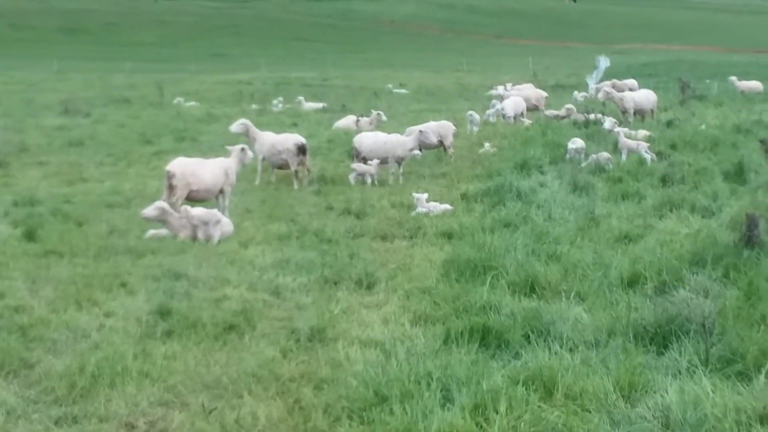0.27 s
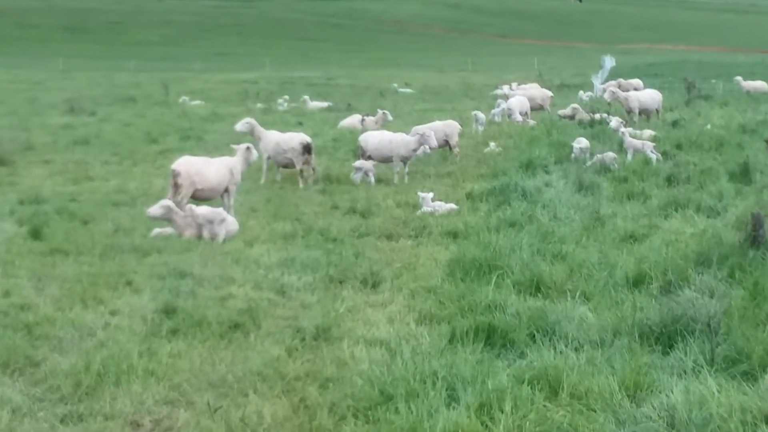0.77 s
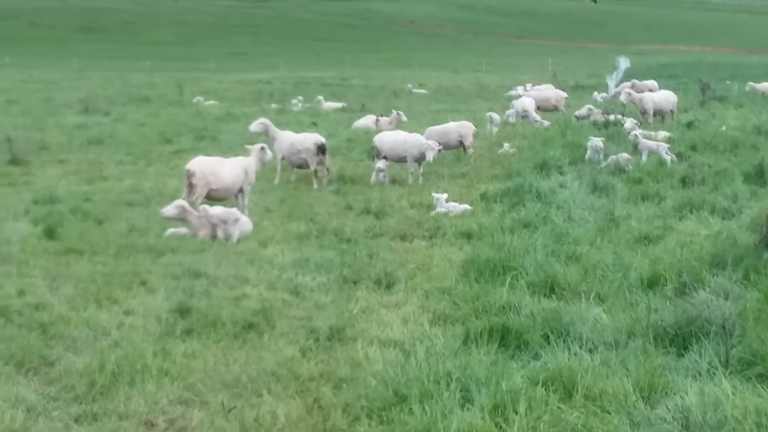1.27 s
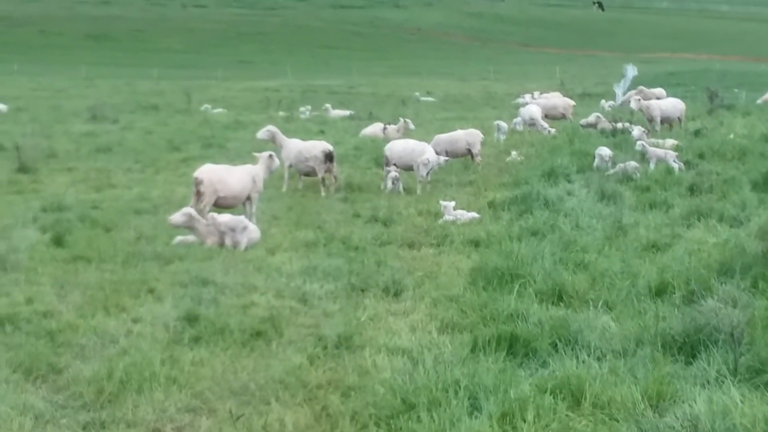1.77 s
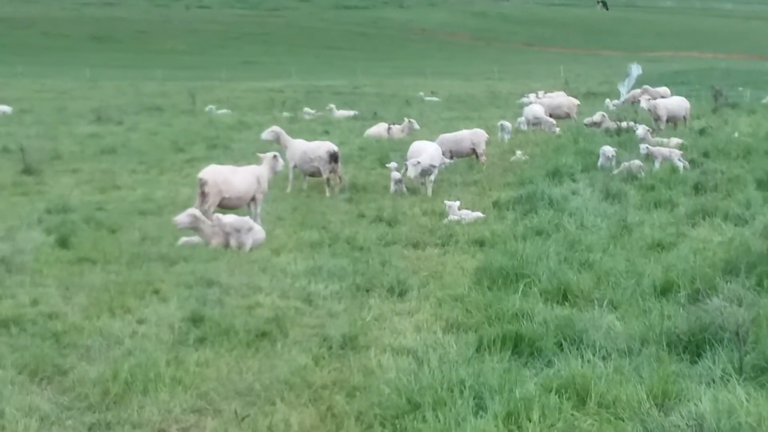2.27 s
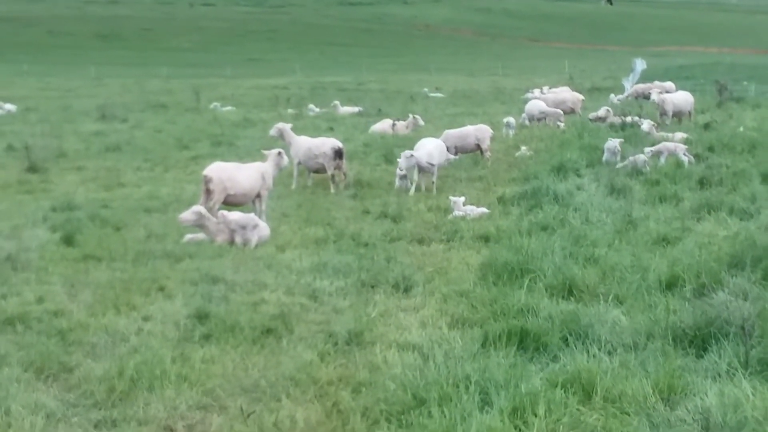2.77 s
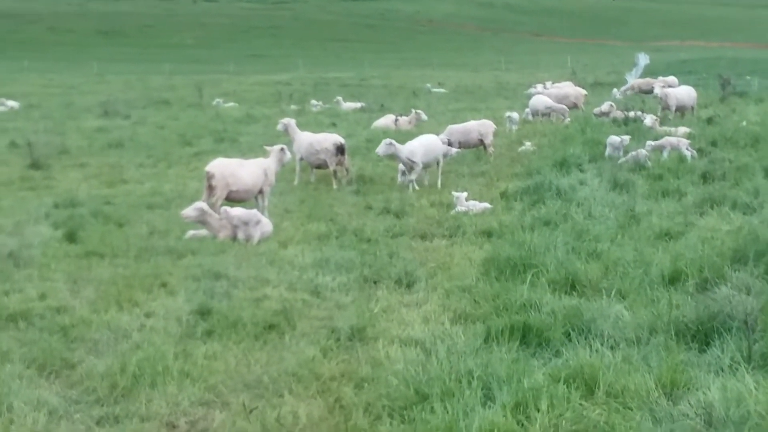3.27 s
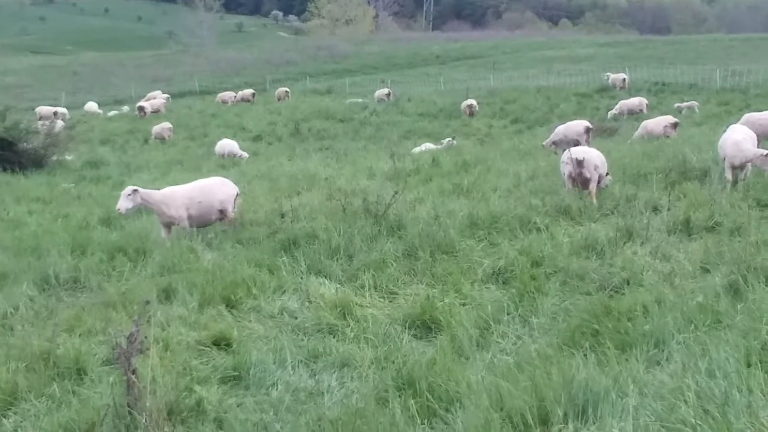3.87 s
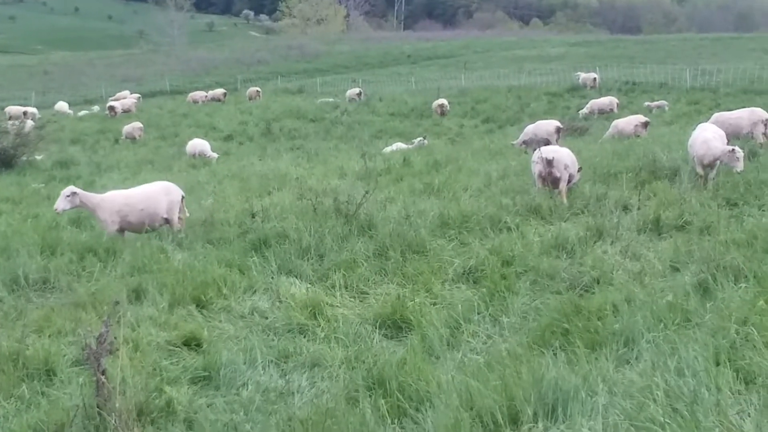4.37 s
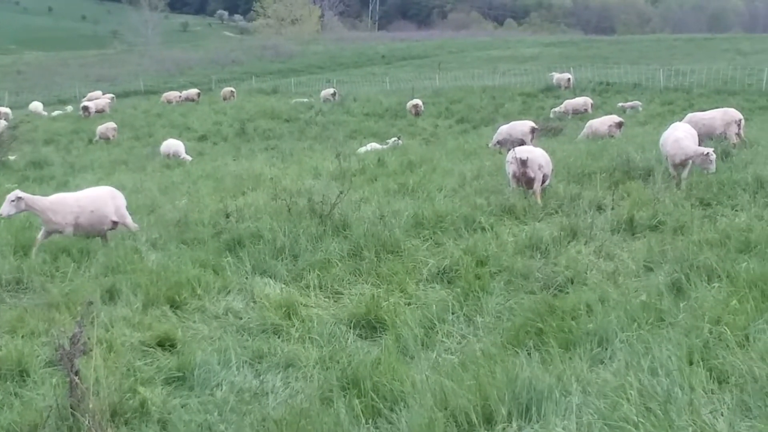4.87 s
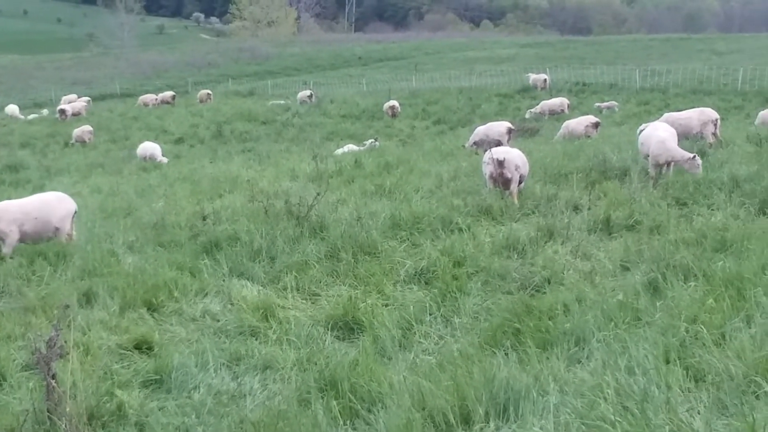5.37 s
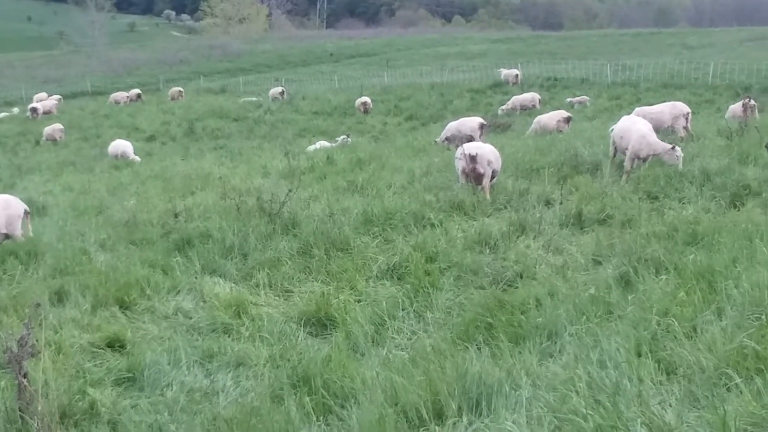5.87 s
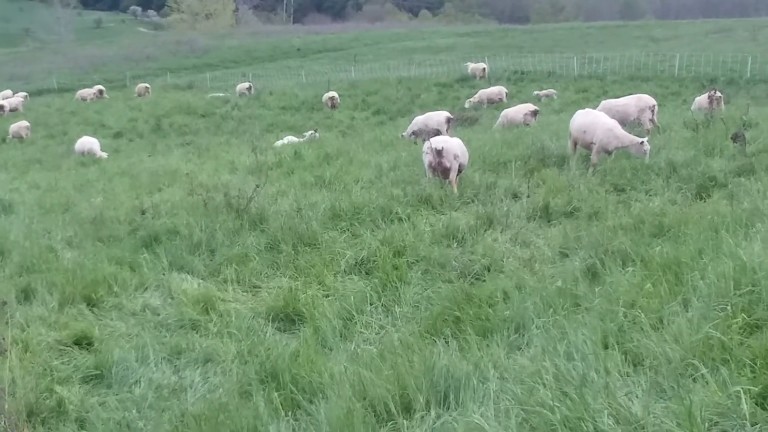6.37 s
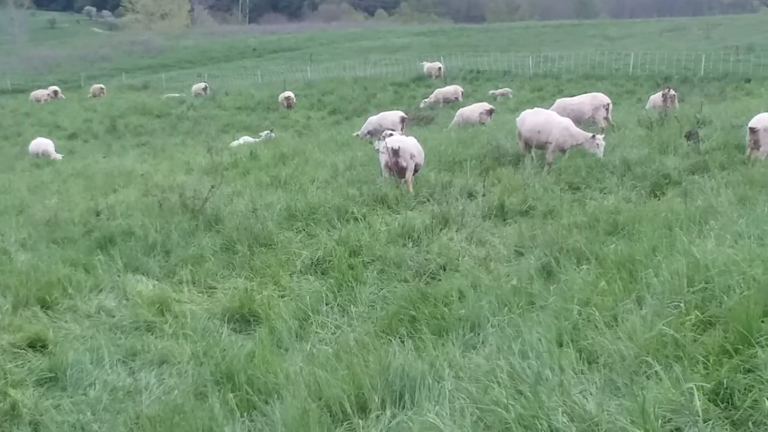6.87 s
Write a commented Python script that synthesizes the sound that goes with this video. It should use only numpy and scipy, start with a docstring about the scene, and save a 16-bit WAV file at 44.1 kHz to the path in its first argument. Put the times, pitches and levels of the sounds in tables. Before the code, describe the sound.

Quiet pasture ambience with far roar and droning engine, small bird whistles, distant lamb bleats, grass ticks and a quick run of frog croaks.

```python
"""Birds whistle and chirp over a far roar, a thin hiss and an idling engine's hum in an open paddock. Grass
rustles and ticks near the microphones, and a faint far rattle murmurs near 2.8 kHz for a while; five lambs
bleat and a frog croaks a rapid run. Birds are gliding tones, lambs harmonic voices with breath, the frog clicks
ringing three modes. Grass and air are shaped noise; engines are sums of sines, a second one joining to beat
against the hum. All sound drops out briefly just before the second engine joins."""
import sys
import numpy as np
from scipy import signal
from scipy.fft import rfft, irfft, next_fast_len
from scipy.io import wavfile
from scipy.ndimage import uniform_filter1d, map_coordinates

SR = 44100
rng = np.random.default_rng(int(sys.argv[2]) if len(sys.argv) > 2 else 0)


def to_wav(sig):
    """Store sig (one row per channel, or 1-D mono) as 16-bit WAV at the path in sys.argv[1].

    Samples outside -1..1 are clipped; the rate is SR.
    """
    pcm = np.clip(np.atleast_2d(sig), -1, 1) * 32767
    pcm = np.round(pcm).astype(np.int16)
    wavfile.write(sys.argv[1], SR, pcm.T)  # frames by channels


N = 313551


def amp(db):
    """Gain of a level in dB."""
    return 10 ** (np.asarray(db) / 20)


def unit(x):
    """x at rms 1."""
    return x / np.sqrt(np.mean(x ** 2) + 1e-20)


def along(points, hz):
    """Value at hz of a curve of (Hz, value) points, read on a log frequency axis."""
    f, v = np.transpose(points)
    return np.interp(np.log(hz + 1), np.log(f + 1), v)


def span(rows, smooth=.004):
    """First sample, times and smoothed columns of a table whose rows start with a time in seconds."""
    s, *columns = np.transpose(rows)
    t = np.arange(max(round(s[0] * SR), 0), min(round(s[-1] * SR), N)) / SR
    width = int(smooth * SR) + 1
    curves = [uniform_filter1d(np.interp(t, s, c), width, mode="nearest") for c in columns]
    return round(t[0] * SR), t, curves


def wobble(rate, count=N):
    """A smooth random curve with rate knots a second."""
    knots = rng.standard_normal(int(count * rate / SR) + 4)
    return map_coordinates(knots, [np.arange(count) * rate / SR])


def filtered(x, response):
    """x with its spectrum multiplied by a response of frequency."""
    m = next_fast_len(x.shape[-1] + 8192)
    return irfft(rfft(x, m) * response(np.fft.rfftfreq(m, 1 / SR)), m)[..., :x.shape[-1]]


def add(out, start, x, lean_db=0.):
    """Mix x into both channels, leaning left by lean_db."""
    x = x[:N - start]
    out[:, start:start + len(x)] += amp([[lean_db / 2], [-lean_db / 2]]) * x


def rush(colour, patchy_db):
    """Patchy stereo noise of rms 1, nearly alike in the bass and looser in the treble."""
    # Each row: frequency in Hz, left-right correlation from 0 to 1.
    alike = [(60, 1), (180, 0.99), (550, 0.91), (1650, 0.48), (4970, 0.62), (15000, 0.49)]
    # Sound from all round favours one side. Each row: frequency in Hz, left over right in dB.
    lean = [(300, -1.1), (1200, 2), (2500, 3), (8000, 4), (15000, 0)]
    z = signal.stft(rng.standard_normal((2, N)), nperseg=512)[2]
    # One random patchwork over frequency and time, shared by both channels.
    patches = rng.standard_normal(z.shape[1:])
    patches = uniform_filter1d(uniform_filter1d(patches, 5, 0), 12, 1)
    pair = signal.istft(z * amp(patchy_db * unit(patches)), nperseg=512)[1][:, :N]

    def mid_side_response(hz):
        turn = np.arccos(np.clip(along(alike, hz), -1, 1)) / 2
        return amp(along(colour, hz)) * [np.cos(turn), np.sin(turn)]

    mid, side = filtered(pair, mid_side_response)
    stereo = np.array([mid + side, mid - side])
    return unit(filtered(stereo, lambda hz: amp(along(lean, hz) * [[.5], [-.5]])))


def air():
    """Far traffic and wind make a broad roar; a thin hiss lies above it; both waver slowly as shaped noise."""
    # Each row: time in seconds, relative roar level in dB, relative hiss level in dB.
    levels = [(0, -58, -74.5), (1.5, -56.5, -73.5), (3.2, -58.5, -74), (3.4, -56.5, -68), (4.2, -57.5, -71),
              (5.5, -57, -71.5), (7.11, -57, -71)]
    # Spectrum of the roar. Each row: frequency in Hz, relative density in dB per Hz.
    roar_colour = [(25, -54), (40, -19.5), (77, -6.5), (105, -2.5), (208, -12), (350, -22), (800, -18),
                   (1400, -26.5), (2300, -32.5), (2900, -35), (4200, -41), (5200, -51.5), (7000, -82.5)]
    # Spectrum of the hiss. Each row: frequency in Hz, relative density in dB per Hz.
    hiss_colour = [(3000, -27.5), (5000, -5), (6800, -7.5), (8200, -1), (8900, -6), (9300, -11),
                   (11300, -6), (12300, -7.5), (15500, -6)]
    s, roar_db, hiss_db = np.transpose(levels)
    t = np.arange(N) / SR
    roar_gain = amp(np.interp(t, s, roar_db) + 7.5 + .6 * wobble(6))
    hiss_gain = amp(np.interp(t, s, hiss_db) + .5 * wobble(4))
    return roar_gain * rush(roar_colour, patchy_db=1.45) + hiss_gain * rush(hiss_colour, patchy_db=2.1)


def engines():
    """Multiples of an unsteady shaft rate hum far off; a second engine fires slightly faster and beats."""
    # The first engine. Each row: time in seconds, shaft rate in Hz, rms level of the fifth order in dB.
    hum_curve = [(0, 21.22, -42), (.5, 21.15, -41.5), (1.2, 21.19, -44), (1.9, 21.2, -46),
                 (2.4, 21.28, -48.5), (2.52, 21.33, -62), (2.65, 21.3, -49), (3, 21.35, -45.5),
                 (3.24, 21.32, -55.5), (3.36, 21.2, -48), (3.7, 21.23, -38.5), (4.3, 21.42, -43),
                 (5.2, 21.44, -39.5), (6.1, 21.36, -43.5), (7.11, 20.79, -46.5)]
    # Its other lines. Each row: shaft order, relative level in dB.
    idle_orders = [(4, -53), (6, -64), (7, -68), (8, -60.5), (9.5, -69), (10, -65), (10.5, -68.5),
                   (15, -69), (20, -72.5), (25, -71.5)]
    # Each row: time in seconds, beats per second, firing rms level in dB, relative overtone level in dB.
    second_engine = [(3.36, 1, -58, -64), (3.9, 2.35, -45, -61.5), (4.3, 2.67, -48, -65),
                     (4.8, 1.426, -51.5, -62), (5.2, 2.23, -43.5, -57.5), (5.6, 5.35, -44, -58),
                     (6.1, 5.654, -43.5, -65.5), (6.2, 5.93, -43, -61), (7.11, 8.46, -49.5, -60)]
    in_step_s = 6.29  # a moment when both engines push together
    upper_ratio, upper_db = 1.07, -57.5  # weaker line just over the second firing rate, rms level

    _, _, (shaft_hz, hum_db) = span(hum_curve, smooth=.015)
    shaft = 2 * np.pi * np.cumsum(shaft_hz) / SR
    idle = np.zeros(N)
    for order, db in idle_orders:
        idle += amp(db + 1.5 + 2.1 * wobble(3.97)) * np.sin(order * shaft + rng.uniform(0, 2 * np.pi))
    hum = 5 * shaft  # phase of the fifth order, the strongest
    idle += np.sqrt(2) * amp(hum_db) * np.sin(hum)
    out = np.array([idle, idle])

    start, t, (beats, firing_db, overtone_db) = span(second_engine)
    ahead = 2 * np.pi * np.cumsum(beats) / SR
    phase = hum[start:start + len(t)] + ahead - np.interp(in_step_s, t, ahead)
    firing = amp(firing_db) * np.sin(phase)
    firing += amp(upper_db) * np.sin(upper_ratio * phase + rng.uniform(0, 2 * np.pi))
    overtones = np.zeros(len(t))
    for multiple, down_db in [(2, 0), (3, 5)]:
        gain = amp(overtone_db - down_db + 2.66 * wobble(3, count=len(t)))
        overtones += gain * np.sin(multiple * phase)
    add(out, start, np.sqrt(2) * (firing + overtones))
    return out


def grass():
    """Close ticks are dying noise bursts coloured around a centre; rustles are crackly swells of noise."""
    # Each row: start in seconds, peak level in dB, centre in Hz, time to fall 60 dB in seconds.
    ticks = [(1.907, -35, 810, .016), (1.919, -35, 1150, .02), (2.04, -48, 7700, 0.0055),
             (2.088, -52, 8600, .005), (3.1773, -29, 1150, .0075), (4.27, -53, 7450, .005),
             (4.289, -48.5, 3805, 0.0067), (5.2437, -45, 2960, 0.0055), (6.53, -51, 9900, .004),
             (6.797, -52, 6000, 0.0062), (7.003, -46, 2203, 0.0074)]
    # Each row: start in seconds, end in seconds, centre in Hz, width in octaves, relative level in dB. # The
    # long narrow band at 2800 Hz from 5.85 s is a faint far rattle.
    rustles = [(1.42, 1.57, 5700, 0.5, -69.5), (.48, .53, 2800, 0.37, -59), (0, 0.68, 2840, 0.078, -73.5),
               (1.95, 1.985, 2850, 0.27, -57), (3.12, 3.18, 2840, 0.23, -62), (2.12, 2.16, 2800, 0.28, -58),
               (2.03, 2.25, 14000, 0.22, -77), (3.72, 3.77, 3300, .3, -70), (4.02, 4.06, 2200, 0.5, -59),
               (4.3, 4.38, 2530, 0.19, -63), (5.29, 5.33, 2200, 0.18, -61), (5.9, 6.03, 2100, 0.27, -63),
               (6.13, 6.25, 1930, 0.2, -62.5), (5.85, 6.72, 2800, 0.12, -70), (6.15, 6.27, 4100, 0.69, -71),
               (4.22, 4.3, 10300, 0.43, -69.5)]
    octaves_at_1khz, narrowing = 1, 0.64  # tick width, and the power by which it falls with pitch
    knock_below_hz = 1500  # lower knocks also ring as a tone
    out, t = np.zeros((2, N)), np.arange(-200, SR // 20) / SR

    def bump(hz, octaves):
        return lambda f: np.exp(-.5 * (np.log2((f + 1) / hz) / octaves) ** 2)

    for s, db, hz, t60 in ticks:
        knock = hz < knock_below_hz
        octaves = octaves_at_1khz * (hz / 1000) ** -narrowing + .15 * knock
        source = rng.standard_normal(len(t)) + 2.2 * knock * np.sin(2 * np.pi * hz * t)
        burst = filtered((t >= 0) * amp(-60 * t / t60) * source, bump(hz, octaves))
        add(out, round((s + t[0]) * SR), amp(db) * burst / np.max(np.abs(burst)))
    for begin, end, hz, octaves, db in rustles:
        count = round((end - begin) * SR)
        crackle = amp(2.2 * wobble(157, count=count)) * rng.standard_normal(count)
        rustle = unit(filtered(crackle, bump(hz, octaves)))
        add(out, round(begin * SR), amp(db) * signal.windows.tukey(count, .6) * rustle, 1.5)
    return out


def birds():
    """Each note is a pure tone gliding or arching in pitch, with a rough, changing level."""
    # Glides that come to rest. Each row: start in seconds, length in seconds, first pitch in Hz,
    # last pitch in Hz, relative level in dB.
    whistles = [(.085, .035, 4800, 4560, -75), (0.123, 0.08, 4450, 3800, -68), (.14, .035, 3280, 3150, -71),
                (.21, 0.047, 3760, 3590, -62.5), (0.475, 0.047, 2900, 2470, -61.5),
                (0.485, .028, 2900, 3610, -64), (0.544, 0.063, 3760, 3600, -63),
                (0.621, 0.26, 3700, 3240, -60.5), (1.93, .014, 3230, 3200, -64),
                (1.865, .045, 4150, 3800, -71.5), (1.952, 0.029, 2970, 3350, -62.5),
                (2.12, 0.05, 2860, 2470, -62), (2.757, 0.027, 3780, 4146, -73),
                (2.778, .035, 4000, 3800, -66.5), (2.804, 0.023, 2780, 3130, -72),
                (2.84, .022, 2750, 3150, -72), (5.18, 0.051, 4130, 3587, -78),
                (5.304, 0.071, 1593, 1635, -73), (5.951, 0.066, 2300, 2787, -76),
                (6.408, 0.073, 4650, 3968, -79), (6.485, 0.066, 3880, 3590, -74),
                (6.441, .057, 3193, 3994, -76), (6.55, .065, 2340, 2390, -77),
                (6.616, 0.046, 2120, 2080, -71), (6.59, 0.055, 3000, 3400, -81),
                (6.638, 0.038, 3410, 4000, -73.5), (6.735, .015, 4350, 4750, -72),
                (6.749, 0.026, 3970, 3350, -69), (6.808, .08, 3850, 3660, -69),
                (6.85, 0.04, 3770, 4260, -69), (6.854, 0.14, 2700, 2520, -78),
                (6.904, .055, 3880, 3300, -70), (6.947, 0.046, 3290, 3210, -68.5),
                (6.915, .028, 4300, 4530, -74), (7.027, 0.07, 3310, 2070, -72.5),
                (7.072, 0.046, 3512, 4168, -70)]
    # Up-and-down arches. Each row: start in seconds, length in seconds, top in Hz, relative level in dB.
    chirps = [(.005, 0.016, 4280, -65.5), (.042, .022, 4170, -71), (0.097, 0.034, 4310, -66),
              (0.195, 0.069, 4500, -66.5), (0.296, 0.14, 4280, -69), (0.517, 0.029, 4400, -75),
              (.725, 0.029, 4320, -74), (1.517, 0.068, 4450, -66), (1.604, 0.086, 4400, -66),
              (1.99, .018, 4300, -73), (2.26, .013, 4300, -69), (2.282, .018, 4100, -75),
              (2.373, .045, 4180, -77), (2.474, .032, 4280, -71), (2.574, 0.052, 4510, -67.5),
              (2.648, 0.11, 4324, -70), (6.816, .025, 4400, -77), (7.02, 0.022, 4350, -72)]
    slowest_hz_per_s, settle = 7500., 2.7  # nominal slowest glide; how sharply it levels off
    arch_hz, arch_s = 447, .04  # depth of a long arch; chirps shorter than arch_s arch much less
    arch_top = 0.68  # share of the chirp spent rising
    fade_db_per_s, swell_db_per_s = 23.5, 92  # notes weaken as they last, rising whistles grow
    rasp_below_hz, rasp_db, plain_db = 2950., 3.5, 2.2  # low notes flicker more in level
    far_count, far_low_hz, far_high_hz, far_db = 55, 2600, 4600, -85  # far_db is a relative level
    out = np.zeros((2, N))

    def clock(length):
        return np.arange(round(length * SR)) / SR

    def sing(s, hz, db, rising=False):
        count = len(hz)
        slope = swell_db_per_s if rising else -fade_db_per_s
        rough_db = rasp_db if hz.mean() < rasp_below_hz else plain_db
        level = amp(db + 6.0 + slope * np.arange(count) / SR + rough_db * wobble(111, count=count))
        level *= signal.windows.tukey(count, min(1, 1000 / count))
        phase = 2 * np.pi * np.cumsum(hz + 14 * wobble(70, count=count)) / SR
        add(out, round(s * SR), level * np.sin(phase))

    for s, length, first_hz, last_hz, db in whistles:
        way = clock(length) / min(length, abs(last_hz - first_hz) / slowest_hz_per_s)
        glide = way / (1 + way ** settle) ** (1 / settle)
        glide *= (1 + way[-1] ** -settle) ** (1 / settle)  # so that it ends on the last pitch
        sing(s, first_hz + (last_hz - first_hz) * glide, db, last_hz > first_hz)

    # More birds further off, scattered at random.
    far = [(a * N / SR, .02 + .04 * b, far_low_hz + c * (far_high_hz - far_low_hz), far_db + 6 * d)
           for a, b, c, d in rng.random((far_count, 4))]
    for s, length, top_hz, db in chirps + far:
        t = clock(length)
        side_share = np.where(t < arch_top * length, arch_top, 1 - arch_top)
        from_top = (t / length - arch_top) / side_share
        sing(s, top_hz - arch_hz * np.tanh(length / arch_s) * from_top ** 2, db)
    return out


def lambs():
    """A quavering harmonic voice is coloured by throat and mouth, with breath let through once a cycle."""
    # One table per bleat. Each row: time in seconds, pitch in Hz, relative level in dB,
    # and for the moving mouth of bleat_first its resonance in Hz.
    bleat_first = [(.812, 344, -55, 3480), (.96, 347.7, -50.5, 3420), (1.04, 360.4, -49, 3150),
                   (1.13, 371, -49, 3150), (1.22, 371, -49.5, 3170), (1.33, 361.7, -51.5, 3090),
                   (1.397, 370.7, -52, 3050), (1.425, 338, -54, 2960), (1.49, 335, -55.5, 2850)]
    bleat_near = [(3.34, 403.8, -37.5), (3.42, 395.7, -41.5), (3.452, 401.8, -38.5), (3.478, 393.4, -41.5),
                  (3.57, 389.3, -44.5), (3.62, 397, -43), (3.68, 389.5, -43.5), (3.72, 376.6, -46.5),
                  (3.765, 346, -49)]
    bleat_long = [(3.34, 386.7, -61), (3.44, 389.8, -54.5), (3.56, 391.2, -51), (3.75, 384.2, -55.5),
                  (3.93, 377.2, -58), (3.97, 368.5, -57.5), (4.03, 372, -58.5), (4.085, 360, -64)]
    bleat_far = [(3.42, 432.7, -61), (3.484, 455.6, -57), (3.61, 479.7, -64), (3.7, 476, -52.5),
                 (3.86, 441.5, -56), (3.91, 452, -57), (3.97, 434, -63)]
    bleat_faint = [(3.76, 420.5, -68), (3.85, 423, -66), (4, 402, -67), (4.11, 420, -69), (4.24, 406, -80)]
    # Throat and mouth resonances of each lamb. Each row: frequency in Hz, relative level in dB.
    throat_first = [(700, -36), (1400, -9), (1800, -3.5), (2150, 1.5), (2550, -11.5), (3600, -9.5),
                    (3800, -4), (4000, 0.5), (4250, 6.5), (4500, -0.5), (4800, -20.5), (5150, -21),
                    (5550, -21.5), (6300, -35.5)]
    throat_near = [(400, -31.5), (800, -16), (1190, 1), (1600, -21), (2400, -18), (2800, -21), (3170, -9),
                   (3600, -24), (4350, -8), (4750, -11), (5150, -18.5), (5550, -31), (6000, -29.5),
                   (6500, -33), (9000, -33), (14000, -44)]
    throat_long = [(1100, -31), (1540, -6), (1950, -11), (2340, -14), (2700, -10), (3080, 5), (3450, -19),
                   (4200, -24), (4950, -25), (5400, -10), (5750, -22), (6300, -30), (8000, -50)]
    throat_far = [(900, -24), (1380, 0), (1900, -17), (2760, -13), (3300, -12), (4000, -40)]
    throat_faint = [(1900, -21), (2500, 2), (3200, -14), (4150, -5), (4550, 0), (5000, -8), (5600, -39)]
    # Each row: bleat, throat, quaver rate in Hz, quaver depth as a share of pitch, time of a quaver crest
    # in seconds, breath share of power, share added at the end, lean to the left in dB before shading.
    flock = [(bleat_first, throat_first, 21.5, .013, 1.21, .05, .1, .1),
             (bleat_near, throat_near, 22, .001, 3.45, .035, .4, .1),
             (bleat_long, throat_long, 18, .001, 3.5, .05, .2, 1.5),
             (bleat_far, throat_far, 12, .004, 3.6, .15, .3, -1.5),
             (bleat_faint, throat_faint, 15, .002, 4.1, .35, .3, .1)]
    attack_s, release_s = 0.016, 0.035  # of every bleat
    crack_s = 0.039  # the voice turns breathier over this last stretch
    mouth_db, mouth_width_hz = 13, 290  # the moving resonance
    breath_rises = 0.17  # breath is brighter than the voice: power of frequency
    out = np.zeros((2, N))

    for bleat, throat, quaver_hz, depth, crest, hoarse, crack, lean_db in flock:
        start, t, (hz, db, *mouth) = span(bleat, smooth=0.01)
        left_s = t[-1] - t  # time remaining

        def colour(f, resonances):
            bumps = [mouth_db * np.exp(-.5 * ((f - m) / mouth_width_hz) ** 2) for m in resonances]
            return along(throat, f) + sum(bumps)

        def breath_response(f):
            mean_mouth = [m.mean() for m in mouth]
            return amp(colour(f, mean_mouth)) * f ** breath_rises * (f > 500)

        quaver = np.cos(2 * np.pi * quaver_hz * (t - crest))
        hz = hz * (1 + depth * quaver + 0.00094 * wobble(70, count=len(t)))
        phase = 2 * np.pi * np.cumsum(hz) / SR
        k = np.arange(1, 18)[:, None]  # harmonic numbers
        flicker = np.array([wobble(16.0, count=len(t)) for _ in k])  # every harmonic on its own
        spread = 2 * np.pi * rng.random(k.shape)  # random phase for each harmonic: a less spiky voice
        harmonics = amp(colour(k * hz, mouth) + 1.7 * flicker) * np.cos(k * phase + spread)
        voice = np.sum(harmonics, axis=0)
        breath = filtered(rng.standard_normal(len(t)) * (1 + np.cos(phase)), breath_response)
        breaking = np.clip((crack_s - left_s) / attack_s, 0, 1)
        hoarse = np.clip(hoarse + crack * breaking, 0, 1)
        sound = np.sqrt(1 - hoarse) * unit(voice) + np.sqrt(hoarse) * unit(breath)
        shape = np.clip(np.minimum((t - t[0]) / attack_s, left_s / release_s), 0, 1)
        add(out, start, amp(db - 0.46 * quaver) * shape * sound, lean_db)
    return out


def frog():
    """Each croak is five evenly spaced clicks, mostly growing, that ring a vocal sac with three close modes."""
    # One entry per croak: relative level in dB.
    croaks = [-39, -37.5, -36, -36, -35, -35.5, -35.5]
    first_croak_s, croak_every_s = 4.533, .0927
    warm_up = 1.3  # croaks the frog takes to warm up
    crest_s = .0009  # the modes line up about this long after the click
    out, t = np.zeros((2, N)), np.arange(SR // 40) / SR

    for n, db in enumerate(croaks):
        def warming(first, full):
            return full + (first - full) * np.exp(-n / warm_up)

        # Each setting moves from the first croak to full voice.
        click_every_s, hz = warming(.0077, .0088), warming(2015, 2188)
        t60, side_share = warming(0.02, 0.01), warming(.3, 0.86)  # seconds to fall 60 dB; side-mode share
        for k, down_db in enumerate([10.5, 2.5, 1.5, 5.2, 0.27]):
            s = first_croak_s + n * croak_every_s + k * click_every_s
            swing = 2 * np.pi * hz * (t - crest_s)
            side = 0.8 * np.sin(1.18 * swing + rng.normal(0, 0.25)) + 0.5 * np.sin(0.8 * swing)
            ring = (1 + 0.26 * wobble(1470, count=len(t))) * np.sin(swing)
            ring += side_share * side * amp(-60 * t / 0.04)  # the side modes die sooner
            decay = amp(db - down_db + 2.2 + rng.normal(0, .7) - 60 * t / t60)
            onset = (1 - np.exp(-t / 0.00059)) ** 2
            add(out, round(s * SR), decay * onset * ring)
    return out


def scene():
    """Animals reach two microphones around the body between them, faintly smeared by ground and hedges."""
    # The body shades the right side. Each row: frequency in Hz, left over right in dB,
    # left phase lead in radians.
    shade_rows = [(504, -8, 0.38), (1170, 2, 1.37), (1600, 6, 0.61), (2200, 3, 0.43), (2700, 7.5, 0.72),
                  (3010, 5.5, -0.26), (3260, 7, -1), (4200, 3, -0.2), (4700, 3.5, -0.39), (5470, 7, -.1)]
    shade_table = np.array(shade_rows)

    def shade(hz):
        ratio = amp(along(shade_table[:, [0, 1]], hz)) * np.exp(1j * along(shade_table[:, [0, 2]], hz))
        return ratio ** [[.5], [-.5]]

    animals = birds() + lambs() + frog()
    t = np.arange(SR // 4) / SR
    tail = amp(-60 * t / 0.49) * rng.standard_normal((2, len(t)))
    smear = signal.fftconvolve(animals, tail / np.linalg.norm(tail[0]), axes=1)[:, :N]
    return air() + engines() + grass() + filtered(animals + amp(-12.5) * smear, shade)


def record(dry):
    """The sound drops out briefly, and nothing passes above the band limit."""
    pause_start_s, pause_end_s, ramp_s = 3.2365, 3.3635, 0.003
    top_hz = 15700
    t = np.arange(N) / SR
    on = np.clip(np.maximum(pause_start_s - t, t - pause_end_s) / ramp_s, 0, 1)
    return filtered(dry * on, lambda hz: hz < top_hz)


dry = scene()
out = record(dry)
to_wav(out)
```